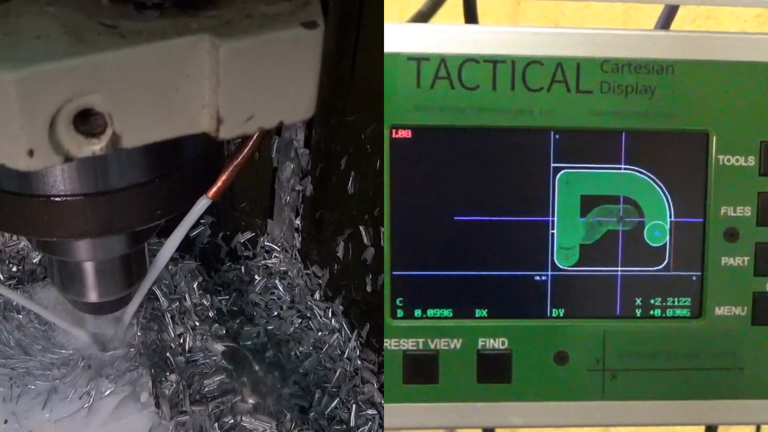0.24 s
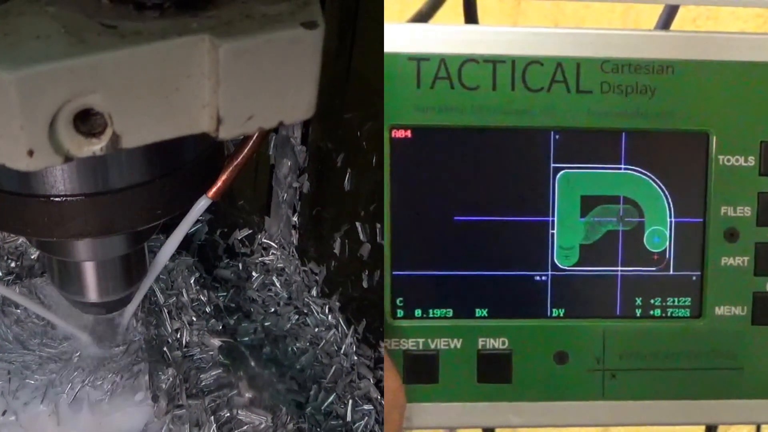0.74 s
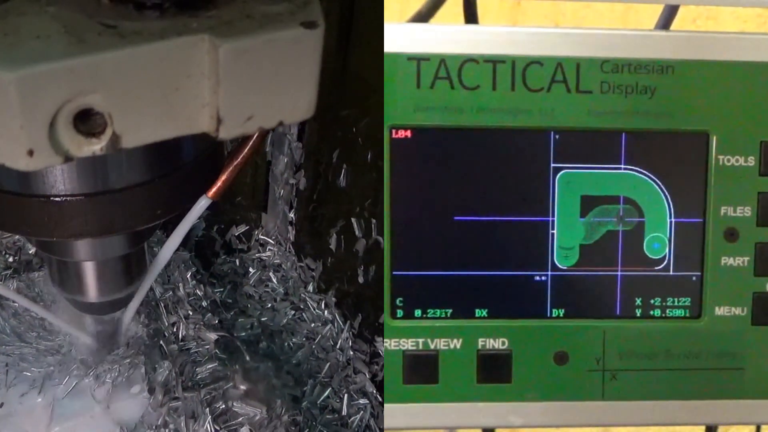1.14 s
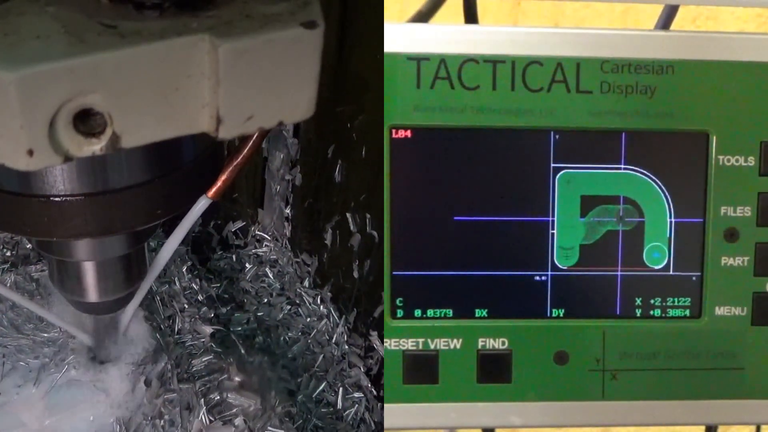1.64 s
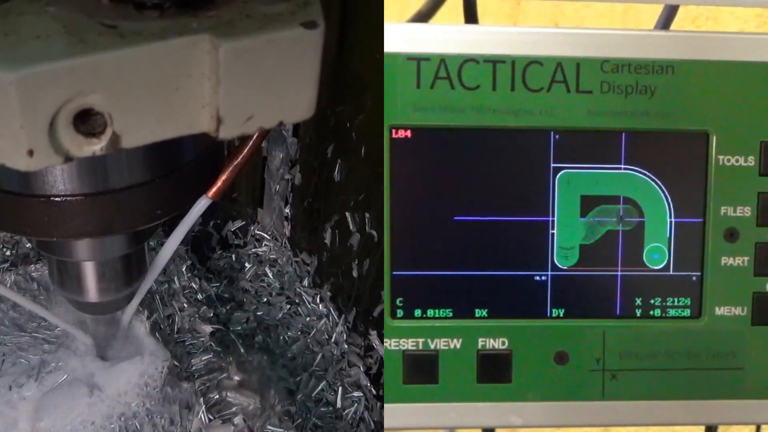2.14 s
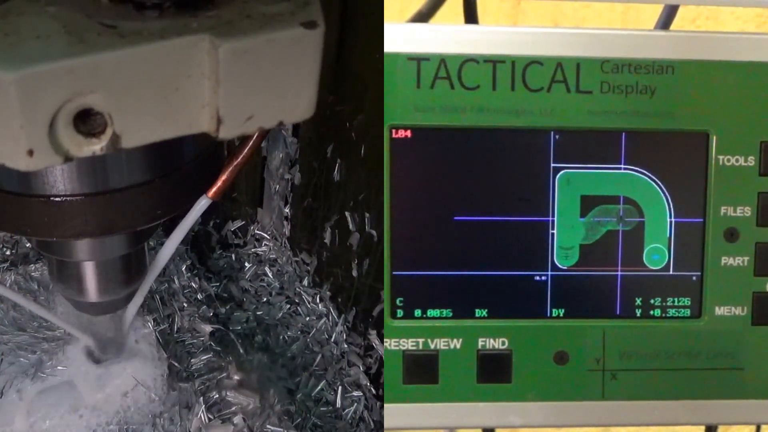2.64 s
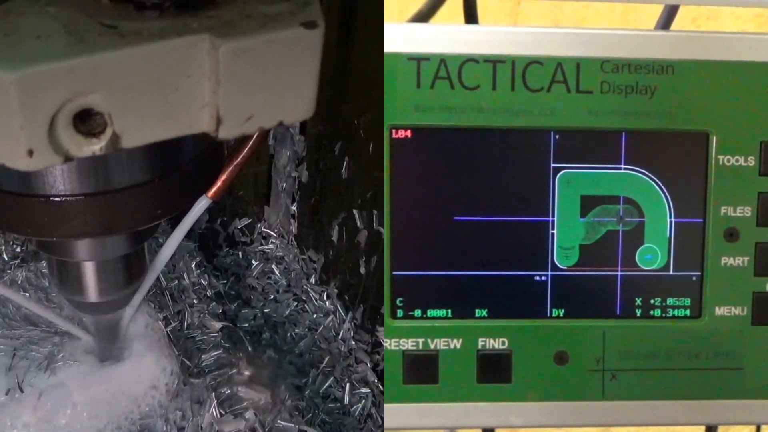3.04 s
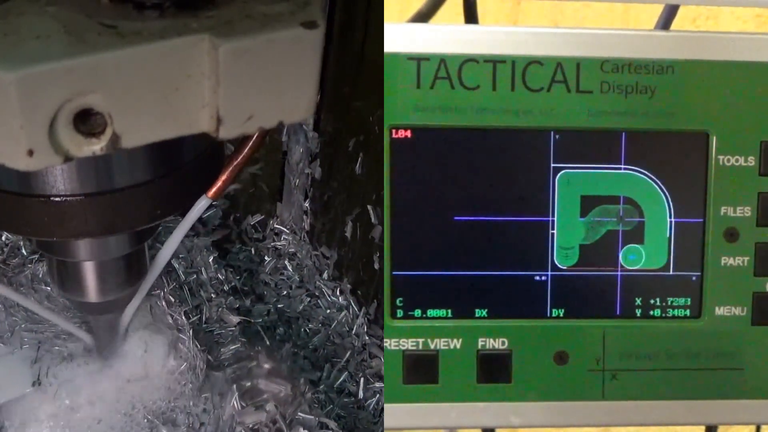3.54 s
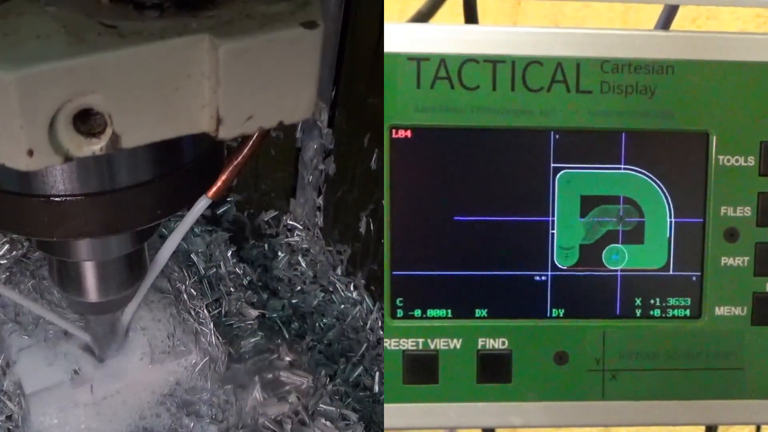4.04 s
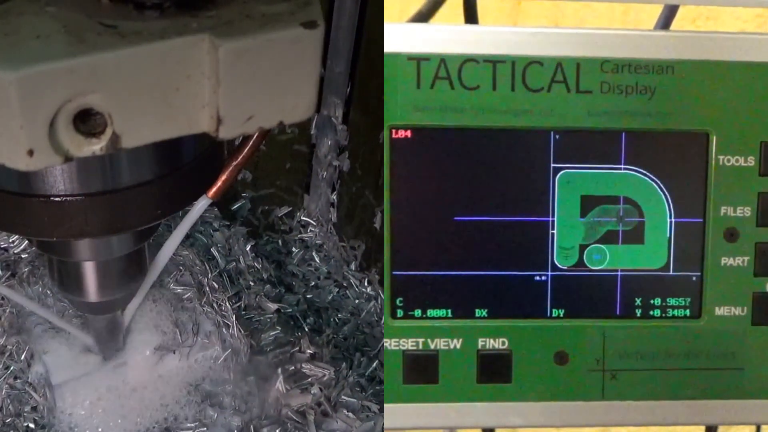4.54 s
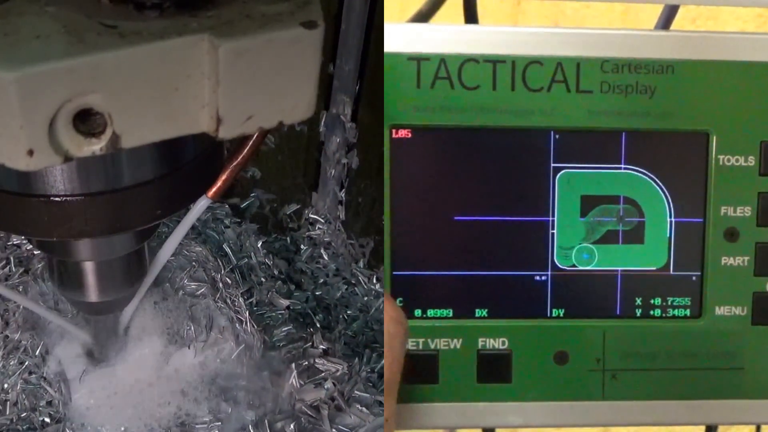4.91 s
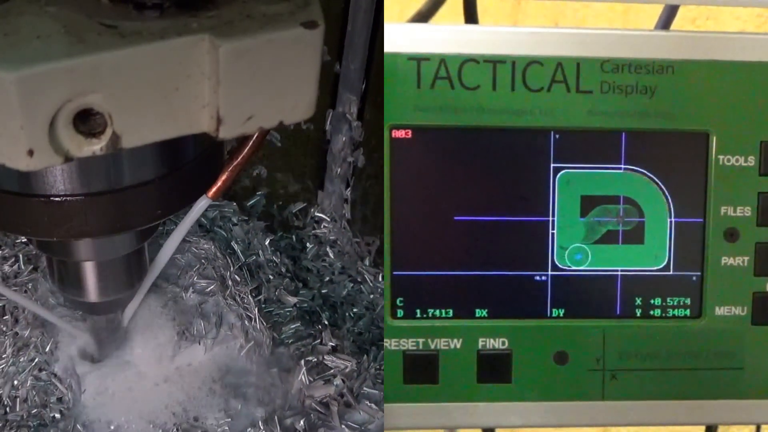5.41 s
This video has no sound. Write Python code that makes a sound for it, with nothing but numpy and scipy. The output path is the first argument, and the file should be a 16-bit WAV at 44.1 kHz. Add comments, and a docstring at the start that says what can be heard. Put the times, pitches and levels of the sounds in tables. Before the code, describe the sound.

A milling machine is already cutting metal, heard close in stereo. From 0 to 1.65 s there is a dense, steady gear hum and buzz, gritty rasp pulsing very fast with the cutter teeth, low frame rumble, coolant spatter and fine hiss. Short high metallic rings flare irregularly, with bright chip ticks near 0.2 and 0.7 s and a dull crunch near 1.0 s. At about 1.66 s a loud, piercing chatter squeal swells up, rough at first, then purer, buzzing rapidly and leaning left; from 1.8 s the other noise sinks far beneath it. At 2.8 s the squeal stops dead. Cutting noise jumps partly back and recovers by about 3.2 s, with a faint sagging feed whine. Until 5.7 s rasp and hum continue with brighter ringing, brief squeaky flares near 3.5, 4.2 and 5.2 s, small crunches and ticks, and a wavering, dipping workpiece drone.

```python
"""In a machine shop, a milling machine drives a two-flute end mill through metal under a jet of coolant.
Spindle and gears hum as harmonic lines; tooth-modulated noise rasps off chips and strikes ring the tool.
Going into a corner, self-excited chatter makes a loud pulsing squeal, a modulated carrier, and most other
noise sinks beneath it. When the squeal stops dead, that noise jumps partly back, then recovers over a
third of a second or so."""
import sys
import numpy as np
from scipy import signal
from scipy.fft import rfft, irfft, next_fast_len
from scipy.io import wavfile
from scipy.ndimage import uniform_filter1d

SR = 44100
rng = np.random.default_rng(int(sys.argv[2]) if len(sys.argv) > 2 else 0)


def to_wav(s):
    """Save 16-bit WAV."""
    ch = np.atleast_2d(s).T  # columns
    pcm = np.round(np.clip(ch, -1, 1) * 32767)  # PCM
    wavfile.write(sys.argv[1], SR, pcm.astype(np.int16))


N = 250047
TIME = np.arange(N) / SR

SPINDLE_HZ = 97.99
SQUEAL_START_S, SQUEAL_STOP_S = 1.657, 2.805
CUTOFF_HZ = 13150

# spindle and gear hum: (multiple of the spindle rate, relative level [dB])
HUM_LINES = [(1, -29.5), (2, -29), (4, -24.5), (5, -16.5), (9, -24.5), (10, -11), (12, -25), (13, -18),
             (14, -14), (15, -19), (16, -12), (17, -15), (18, 0.5), (19, -24), (20, -9.5), (21, -24),
             (22, -5), (23, -14), (25, -26), (26, -8.5), (27, -8), (28, -7), (29, -27), (30, -16), (31, -6),
             (32, -11.5), (33, -36), (34, -8.5), (35, -8), (36, -5.5), (37, -20), (38, -20), (39, -6.5),
             (40, -7), (41, -10), (42, -15)]
# steady motor and drive tones: (frequency [Hz], level before a common trim [dB])
MOTOR_TONES = [(295, -65.5), (599.5, -53.5), (1798, -56.5), (2013, -56.5), (2299, -56), (2367, -49.5),
               (3631, -58), (4133, -55), (4167, -63), (6380, -56.5)]
DRIVE_TONES = [(8419, -66), (8995, -61.5), (9695, -56.5), (10449, -56.5), (10503, -51.5), (11149, -54.5)]
# noise spectra, relative: (frequency [Hz], spectral density [dB per Hz])
RASP_COLOUR = [(200, -34.5), (400, -15), (550, -7.5), (1000, -4.5), (1450, -8.5), (2100, 2), (2600, 1),
               (3200, -0.5), (4200, 0.5), (4800, 3.5), (5800, 0), (6400, -1), (7000, -11), (9000, -18.5)]
SPRAY_COLOUR = [(3000, -17.5), (6000, 2.5), (7000, -2), (8300, 3), (8650, -4.5), (9500, -5), (10400, -2.5),
                (11300, -6), (11900, -5), (13200, -8.5)]
RUMBLE_COLOUR = [(20, -24), (60, -21), (100, -2), (140, -4.5), (190, -2), (300, -1), (500, -6.5),
                 (1000, -19.5)]
HISS_COLOUR = [(3000, -31), (8000, -3), (11000, 13), (13200, -1)]
CRUNCH_COLOUR = [(150, -32), (500, -8.0), (1300, -1.5), (3000, 3), (8000, -16)]
# spectrum of the uneven chatter motion: (frequency [Hz], relative level [dB])
UNEVEN_COLOUR = [(3000, -61), (4300, -22), (4600, -13.5), (4710, -7), (4800, -17), (4890, -5), (5080, -6.5),
                 (5280, 8.5), (5570, 6.5), (5770, 1), (5880, -9), (6400, -12), (7800, -29), (10000, -70)]
# likeness of the two microphones: (frequency [Hz], left-right likeness [0-1])
MIC_LIKENESS = [(30, .55), (80, .83), (300, .9), (800, .94), (1400, .92), (3000, .84), (6300, .72),
                (9000, .62), (13000, .5)]
# balance of the two microphones: (frequency [Hz], left minus right [dB])
MIC_LEAN = [(60, 0.5), (110, 1.0), (200, 1.0), (370, 0.56), (670, 0.31), (1230, 0.87), (2240, 3),
            (4110, 1.6), (7510, 4.7), (13700, 4.3)]
# how heavily the cutter is loaded: (time [s], load [dB])
CUTTER_LOAD = [(0.0, -0.8), (0.45, -0.9), (0.65, -1.1), (1.5, 0.5), (1.8, 0.6), (3.1, 0.05), (3.5, 0.6),
               (4.1, 0.6), (4.55, -1.1), (4.9, 1), (5.67, -1.2)]
# frame rumble, apart from its sinking and drift: (time [s], level [dB])
FRAME_RUMBLE = [(0.0, -65), (0.48, -69), (0.6, -62), (1.0, -70), (1.8, -68), (2.8, -66.5), (3.3, -63),
                (3.9, -62.5), (4.6, -68.5), (5.67, -70)]
# ringing of the holder and of the workpiece's wall, before the sinking: (time [s], level [dB])
HOLDER_LEVEL = [(0, -50.5), (1.7, -50), (2.8, -63), (4.55, -59), (4.75, -47), (5.1, -49), (5.67, -48)]
WALL_LEVEL = [(0, -57), (2.8, -60), (3.15, -49), (3.8, -45.5), (4.6, -52), (5.67, -60)]
# flares of the tool's ringing, before the sinking:
# (time [s], half length [s], lower mode level [dB], upper mode level [dB])
TOOL_FLARES = [(0.016, 0.03, -45, -45), (0.18, 0.016, -43, -56), (0.295, 0.02, -43, -42),
               (0.385, 0.011, -52, -37), (0.44, 0.012, -42, -43), (0.574, 0.017, -38, -35.5),
               (0.678, 0.023, -39, -40), (0.755, 0.016, -40, -46), (1.053, 0.046, -36.5, -42),
               (1.21, 0.13, -38, -48), (1.375, 0.0086, -48, -38), (1.465, 0.024, -41, -32),
               (1.618, 0.044, -43, -35.5), (1.8, 0.16, -38, -35), (3.346, 0.03, -48, -42),
               (3.52, 0.061, -47, -34), (3.776, 0.04, -52, -41), (3.97, 0.035, -46, -40.5),
               (4.209, 0.035, -43, -30), (4.546, 0.02, -48, -37), (4.903, 0.025, -47, -40),
               (5.08, 0.016, -48, -40), (5.172, 0.014, -43, -34), (5.34, 0.033, -44, -40)]
# dips in the workpiece's drone: (time [s], half length [s], depth [dB])
DRONE_DIPS = [(1.71, 0.032, 14), (4.235, 0.032, 5), (4.4, 0.035, 8), (4.46, 0.27, 8), (4.69, 0.044, 9),
              (5.12, 0.035, 15), (5.67, 0.074, 9)]
# chips hitting the guard: (time [s], peak level before a common trim [dB], ring frequency [Hz])
CHIP_TICKS = [(0.1501, -22, 11040), (0.1785, -26, 8370), (0.2389, -25, 10500), (0.7183, -20, 6100),
              (1.7549, -19, 6030), (3.996, -18, 8300), (4.7656, -20, 6450), (5, -23, 6300),
              (5.2205, -17, 6300)]
# the cutter crunches through loose chips: (time [s], half length [s], level [dB])
CHIP_CRUNCHES = [(1.043, 0.027, -39.5), (2.252, 0.018, -51.5), (4.0, 0.014, -41), (4.189, 0.023, -40),
                 (4.91, 0.02, -44), (5.231, .011, -35.5)]
# chatter: (time [s], pitch [Hz], share of uneven motion [limited to 0-1])
CHATTER_MOTION = [(1.66, 5482, 1.1), (1.78, 5478, 1.1), (1.87, 5472, 0.75), (2.1, 5462, 0.39),
                  (2.22, 5470, 0.4), (2.35, 5468, 0.25), (2.56, 5480, 0.35), (2.8, 5484, 0.24)]
# dips in the squeal: (time [s], half length [s], depth [dB])
SQUEAL_DIPS = [(1.8, 0.014, 5.5), (1.94, 0.033, 3), (2.195, 0.036, 3), (2.505, 0.016, 1.5),
               (2.58, 0.014, 2.5), (2.665, 0.017, 2.5)]

# under the squeal the other noise drops quickly, then keeps sinking
SINK_START_S, SINK_FALL_S, SINK_DB, SINK_DB_PER_S = 1.807, 0.05, 11, 7.5
# after the squeal the other noise is still low by this much and recovers in this time
RECOVERY_DB, RECOVERY_S = 8.5, 0.38
# the squeal grows, then fades a little
SQUEAL_DB, SQUEAL_RISE_DB, SQUEAL_RISE_S, SQUEAL_FADE_DB_PER_S = -24, 10.5, 0.2, 1.3
# pairs hold the values before and after the end of the corner
LOW_RING_DB, HIGH_RING_DB, RING_FADE_DB_PER_S = (-45.5, -49.5), (-51, -37.5), 2.5
EIGHTH_DB, ELEVENTH_DB = (-53.5, -55), (-57, -45.5)
FEED_HZ, FEED_DB = (443, 824), (-66, -58)


def from_db(db):
    """Decibel law: amplitude is ten to the power of level over twenty."""
    return 10 ** (np.asarray(db) / 20)


def rms_one(x):
    """Normalisation to unit mean power."""
    return x / np.sqrt(np.mean(np.abs(x) ** 2) + 1e-20)


def in_time(rows):
    """Linear interpolation of a table's columns at every sample."""
    s, *columns = np.transpose(rows)
    return np.array([np.interp(TIME, s, c) for c in columns])


def at_hz(points, hz):
    """Interpolation of a spectrum on a log-frequency axis."""
    known_hz, values = np.transpose(points)
    return np.interp(np.log(np.maximum(hz, 1)), np.log(known_hz), values)


def either_side(values):
    """Step change: the value switches where the squeal stops."""
    return np.where(TIME < SQUEAL_STOP_S, values[0], values[1])


def since(s):
    """Elapsed time in seconds since a moment; zero before it."""
    return np.maximum(TIME - s, 0)


def bell(s, half_length_s):
    """Gaussian swell of height 1, at 1/e after its half length."""
    return np.exp(-((TIME - s) / half_length_s) ** 2)


def dips(rows):
    """Superposed Gaussian losses in dB."""
    return sum(depth_db * bell(s, half_length_s) for s, half_length_s, depth_db in rows)


def drift(rate):
    """Low-pass filtered chance: smooth, of spread 1, changing about rate times a second."""
    step = 40  # computed once every 40 samples
    r = np.exp(-2 * np.pi * step * rate / SR)
    kicks = rng.standard_normal(N // step + 2002)
    slow = signal.lfilter([1], [1, -2 * r, r * r], kicks)[2000:]
    return np.interp(np.arange(N) / step, np.arange(len(slow)), rms_one(slow))


def resonate(x, hz, width_hz):
    """Two-pole resonance of about unit gain at its peak."""
    r = np.exp(-np.pi * width_hz / SR)
    numerator = np.array([1, 0, -1]) * (1 - r * r) / 2
    denominator = [1, -2 * r * np.cos(2 * np.pi * hz / SR), r * r]
    return signal.lfilter(numerator, denominator, x + 1e-18)


def pan(lean_db):
    """Stereo by level difference: left and right gains whose mean is 1."""
    gains = from_db(np.array([[.5], [-.5]]) * lean_db)
    return gains / gains.mean(axis=0)


def grains(spread_db):
    """Shot noise: two unrelated streams of tiny impacts, more uneven in size with larger spread."""
    sizes = from_db(spread_db * np.minimum(rng.exponential(1, N // 10 + 1), 6))
    return rng.standard_normal((2, N)) * np.repeat(sizes, 10)[:N]


def colour(streams, spectrum):
    """Spectral shaping and partial coherence: stereo noise, less alike in the treble; rms 1."""
    size = next_fast_len(N)
    hz = np.arange(size // 2 + 1) * SR / size
    mid, side = rfft(streams, size) * from_db(at_hz(spectrum, hz))
    alike = np.clip(at_hz(MIC_LIKENESS, hz), 0, .99)
    pair = np.sqrt(1 + alike) * mid + np.sqrt(1 - alike) * side * [[1], [-1]]
    return rms_one(irfft(pair * pan(at_hz(MIC_LEAN, hz)), size)[:, :N])


def tone(cycles, hz, waver_db=1.9, waver_rate=7, blur=0.25):
    """Sinusoid wavering in level and phase; less alike channels stand further apart in phase."""
    phase = 2 * np.pi * ((cycles + rng.random()) % 1) + blur * drift(waver_rate)
    skew = rng.choice([-1, 1]) * np.arccos(np.clip(at_hz(MIC_LIKENESS, hz), 0, 1)) / 2
    wave = np.sin((phase + np.array([[skew], [-skew]])).astype(np.float32))
    return np.sqrt(2) * wave * from_db(waver_db * drift(waver_rate)) * pan(at_hz(MIC_LEAN, hz))


def corner():
    """Level losses in dB: the noise sinks under the squeal, and is still low just after it."""
    under_squeal = since(SINK_START_S)
    sunk = SINK_DB * np.minimum(under_squeal / SINK_FALL_S, 1) + SINK_DB_PER_S * under_squeal
    recovery = RECOVERY_DB * np.maximum(1 - since(SQUEAL_STOP_S) / RECOVERY_S, 0)
    return either_side((sunk, 0)), either_side((0, recovery))


def hum(turns, presence, hum_db=-50.3, motor_db=-1.18, drive_db=-1):
    """Harmonic series: rotation gives spindle multiples, joined by fixed motor and drive tones."""
    gears = sum(from_db(db) * tone(k * turns, k * SPINDLE_HZ) for k, db in HUM_LINES)
    motor = sum(from_db(db) * tone(hz * TIME, hz) for hz, db in MOTOR_TONES)
    drive = sum(from_db(db) * tone(hz * TIME, hz, waver_db=1.7, waver_rate=16, blur=0.41)
                for hz, db in DRIVE_TONES)
    return presence * (from_db(hum_db) * gears + from_db(motor_db) * motor + from_db(drive_db) * drive)


def feed(sunk_db, sag_hz_per_s=50, hold_s=0.6, fade_db_per_s=35):
    """Frequency integrated to phase: a faint whine jumps up as the table turns, then sags and fades."""
    hz = either_side(FEED_HZ) - sag_hz_per_s * since(SQUEAL_STOP_S)
    db = either_side(FEED_DB) - sunk_db - fade_db_per_s * since(SQUEAL_STOP_S + hold_s)
    # the feed hunts a little, so its tone is less clean than the spindle's
    return from_db(db) * tone(np.cumsum(hz) / SR, hz.mean(), waver_rate=20, blur=0.57)


def fine_hiss(presence, hiss_db=-55.0):
    """Stationary noise: a steady fine hiss in the highest treble, sinking half as many dB as the hum."""
    return from_db(hiss_db) * np.sqrt(presence) * colour(grains(0), HISS_COLOUR)


def bite(turns, runout, sharpness):
    """Periodic cutting force: two teeth a turn, one biting deeper than the other."""
    angle = 2 * np.pi * turns
    return rms_one(np.exp(sharpness * np.cos(2 * angle) + runout * np.cos(angle)))


def rasp(turns, load_db, sunk_db, rasp_db=-39.5):
    """Fracture noise modulated by force: chips tear off under each tooth."""
    torn = colour(grains(1.64) * bite(turns, runout=0.16, sharpness=0.11), RASP_COLOUR)
    return torn * from_db(rasp_db + load_db - sunk_db + 1.1 * drift(20))


def spray(turns, load_db, sunk_db, spray_db=-42.0, follows=1.7, sinks=0.35):
    """Impact noise modulated by force: coolant and swarf spatter more under load."""
    spatter = colour(grains(2.2) * bite(turns, runout=0.19, sharpness=0.08), SPRAY_COLOUR)
    return spatter * from_db(spray_db + follows * load_db - sinks * sunk_db + 1.75 * drift(16))


def rumble(sunk_db, sinks=0.98):
    """Low-frequency random vibration of the frame."""
    rumble_db, = in_time(FRAME_RUMBLE)
    return colour(grains(0), RUMBLE_COLOUR) * from_db(rumble_db - sinks * sunk_db + 1.9 * drift(4.4))


def cutting(turns, load_db, sunk_db, recovery_db):
    """Superposition: rasp and spray recover slowly after the squeal, the low rumble returns at once."""
    chip_noise = rasp(turns, load_db, sunk_db) + spray(turns, load_db, sunk_db)
    return chip_noise * from_db(-recovery_db) + rumble(sunk_db)


def drone(turns, load_db, sunk_db, recovery_db, eighth_follows=2.1, eleventh_follows=0.15,
          sinks=1.45, recovers=0.96):
    """Forced vibration: the workpiece drones on spindle multiples 8 and 11, stronger under load."""
    eighth_db = either_side(EIGHTH_DB) + eighth_follows * load_db
    eleventh_db = either_side(ELEVENTH_DB) + eleventh_follows * load_db
    lines = sum(from_db(db) * tone(k * turns, k * SPINDLE_HZ, waver_db=2.0, blur=0.22)
                for k, db in ((8, eighth_db), (11, eleventh_db)))
    return lines * from_db(-sinks * sunk_db - recovers * recovery_db - dips(DRONE_DIPS))


def struck_mode(turns, hz, width_hz, rough, runout, lean_db):
    """Modal excitation: a resonance struck by each tooth and scraped while the tooth cuts."""
    strikes = np.diff(np.floor(2 * turns), prepend=0) * (1 + runout * np.cos(2 * np.pi * turns))
    strikes = strikes * from_db(1.94 * drift(34))
    scrape = rng.standard_normal((2, N)) * bite(turns, runout, sharpness=0.38)
    scrape = scrape[0] + 0.73 * scrape[1] * [[1], [-1]]
    clean, noisy = (rms_one(resonate(resonate(x, hz, width_hz), hz, width_hz))
                    for x in (strikes, scrape))
    return (np.sqrt(1 - rough) * clean + np.sqrt(rough) * noisy) * pan(lean_db)


def ring_gain(steady_db, flares, flutter_db, flutter_rate):
    """Power addition: a fluttering steady part that fades after the corner, and its flares."""
    faded_db = either_side(steady_db) - RING_FADE_DB_PER_S * since(SQUEAL_STOP_S)
    steady = from_db(faded_db + flutter_db * drift(flutter_rate))
    flare_power = sum((from_db(db) * bell(s, half_length_s)) ** 2 for s, half_length_s, db in flares)
    return np.sqrt(steady ** 2 + flare_power)


def ringing(turns, presence):
    """Modal superposition: wall, holder and two tool modes; the upper steadies after the corner."""
    wall_db, = in_time(WALL_LEVEL)
    holder_db, = in_time(HOLDER_LEVEL)
    low_flares = [(s, length, db) for s, length, db, _ in TOOL_FLARES]
    high_flares = [(s, length, db) for s, length, _, db in TOOL_FLARES]
    low_gain = ring_gain(LOW_RING_DB, low_flares, flutter_db=1, flutter_rate=19)
    high_gain = ring_gain(HIGH_RING_DB, high_flares, flutter_db=2.0, flutter_rate=18)
    wall = struck_mode(turns, hz=2623, width_hz=230, rough=0.14, runout=0.22, lean_db=1.0)
    holder = struck_mode(turns, hz=4090, width_hz=180, rough=0.72, runout=0.23, lean_db=5)
    low = struck_mode(turns, hz=4774, width_hz=250, rough=0.061, runout=0.035, lean_db=4.5)
    high = struck_mode(turns, hz=5385, width_hz=270, rough=either_side((.85, .22)), runout=.2, lean_db=3.0)
    body = wall * from_db(wall_db) + holder * from_db(holder_db)
    return presence * (body + low * low_gain + high * high_gain)


def chips(tick_db=-3, fade_s=0.0059, width_hz=2200):
    """Impact excitation: flying chips tick brightly, and chips cut a second time crunch dully."""
    ticks = np.zeros((2, N))
    for s, db, hz in CHIP_TICKS:
        age = since(s)
        burst = rng.standard_normal((2, N)) * (age > 0) * np.exp(-age / fade_s)
        tick = resonate(burst, hz, width_hz)
        ticks += from_db(db + tick_db) * tick / np.abs(tick).max()
    swell = sum(from_db(db) * bell(s, half_length_s) for s, half_length_s, db in CHIP_CRUNCHES)
    return ticks + swell * colour(grains(2.9), CRUNCH_COLOUR)


def recut(memory):
    """Regenerative feedback: each turn recuts the last one's waves, giving lines a spindle rate apart."""
    size = next_fast_len(N)
    offset_hz = np.fft.fftfreq(size, 1 / SR)
    mean_pitch_hz = np.mean(CHATTER_MOTION, axis=0)[1]
    echo = 1 - memory * np.exp(-2j * np.pi * offset_hz / SPINDLE_HZ)
    kicks = rng.standard_normal(size) + 1j * rng.standard_normal(size)
    spectrum = kicks * from_db(at_hz(UNEVEN_COLOUR, offset_hz + mean_pitch_hz)) / echo
    return rms_one(np.fft.ifft(spectrum)[:N])


def even(x, window_s):
    """Normalisation by running power: the slow level is held at about 1."""
    return x / np.sqrt(uniform_filter1d(np.abs(x) ** 2, int(window_s * SR)) + 1e-12)


def squeal_level():
    """Growth of an instability in dB: a rise, a slow fade throughout, and brief dips."""
    age = since(SQUEAL_START_S)
    rise_db = SQUEAL_RISE_DB * np.maximum(1 - age / SQUEAL_RISE_S, 0)
    return SQUEAL_DB - rise_db - SQUEAL_FADE_DB_PER_S * age - dips(SQUEAL_DIPS)


def chatter_motion(turns, pitch_hz, uneven, runout=0.65, tooth_depth=0.71,
                   turn_swing=0.2, tooth_swing=0.3, tooth_lag=0.77):
    """Self-excited vibration: it swells each turn and tooth, and its pitch sags under load."""
    turn = 2 * np.pi * turns
    tooth = 2 * turn + tooth_lag + 0.27 * drift(4.3)
    swell = np.maximum(1 + runout * np.cos(turn) + tooth_depth * np.cos(tooth), 0)
    phase_swing = turn_swing * np.sin(turn) + tooth_swing * np.sin(tooth)
    regular = rms_one(swell * np.exp(-1j * phase_swing))
    mixed = np.sqrt(1 - uneven) * regular + np.sqrt(uneven) * recut(memory=.88)
    motion = mixed * np.exp(2j * np.pi * np.cumsum(pitch_hz) / SR)
    motion = even(motion, window_s=3 / SPINDLE_HZ)
    # soft limiting flattens the squeal's swells
    return rms_one(motion / np.sqrt(1 + np.abs(motion / 1.4) ** 2))


def squeal(turns, left_lead=0.79, octave_db=-42, octave_follows=1.75):
    """Nonlinear radiation: chatter sounds at its pitch and, through its square, an octave above."""
    level_db = squeal_level()
    pitch_hz, uneven = in_time(CHATTER_MOTION)
    uneven = np.clip(uneven, 0, 1)
    motion = chatter_motion(turns, pitch_hz, uneven)
    # the pure squeal lies further left than the uneven one
    lean_db = 6.9 - 4 * uneven
    channel_phase = np.exp(.5j * left_lead * np.array([[1], [-1]]))  # left_lead in radians
    main = np.sqrt(2) * np.real(motion * channel_phase) * pan(lean_db)
    # the lopsided swing adds an octave, smeared by uneven contact
    smear = np.exp(.9j * np.array([drift(250), drift(250)]))
    octave = rms_one(resonate(np.real(motion ** 2 * smear), hz=11500, width_hz=430))
    octave_gain = from_db(octave_db + octave_follows * (level_db - SQUEAL_DB)) * pan(4.)
    edges_s = [SQUEAL_START_S, SQUEAL_START_S + 0.046, SQUEAL_STOP_S, SQUEAL_STOP_S + 0.00105]
    sounding = np.interp(TIME, edges_s, [0, 1, 1, 0])
    return sounding * (main * from_db(level_db) + octave * octave_gain)


def scene():
    """Superposition of layers, most sharing one rotation, load or passage through the corner."""
    turns = np.cumsum(SPINDLE_HZ * (1 + .0006 * drift(2.16))) / SR
    load_db, = in_time(CUTTER_LOAD)
    sunk_db, recovery_db = corner()
    # the steady tones sink and return together with the rasp
    presence = from_db(-sunk_db - recovery_db)
    machine = hum(turns, presence) + feed(sunk_db) + fine_hiss(presence)
    cut = cutting(turns, load_db, sunk_db, recovery_db) + drone(turns, load_db, sunk_db, recovery_db)
    return machine + cut + ringing(turns, presence) + chips() + squeal(turns)


def record(dry):
    """Low-pass filtering: an elliptic filter cuts the top steeply."""
    return signal.sosfilt(signal.ellip(12, .1, 80, CUTOFF_HZ, fs=SR, output="sos"), dry)


dry = scene()
out = record(dry)
to_wav(out)
```